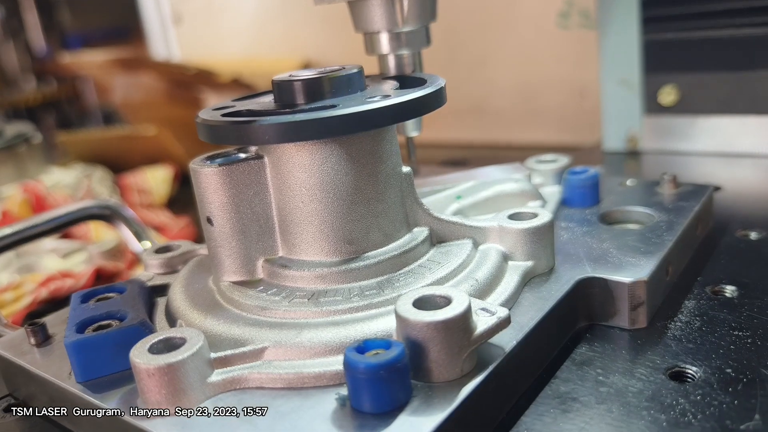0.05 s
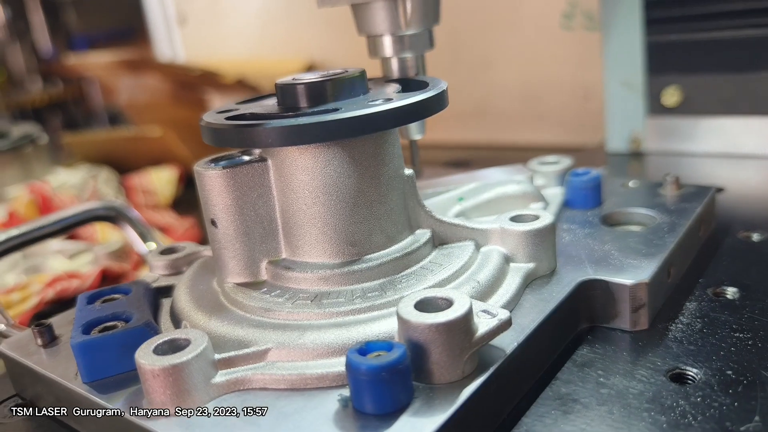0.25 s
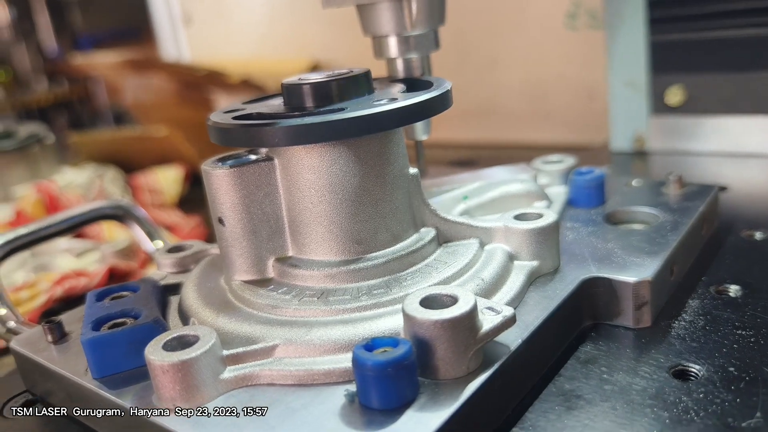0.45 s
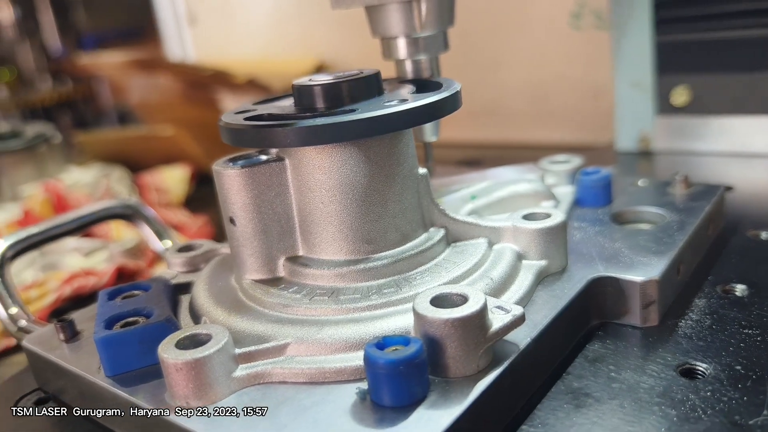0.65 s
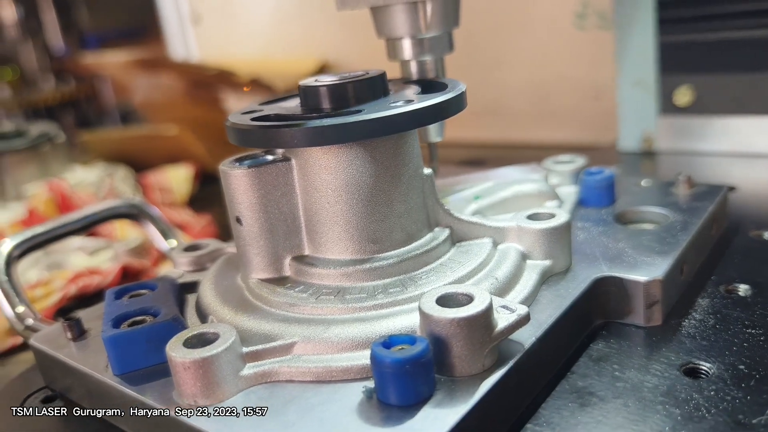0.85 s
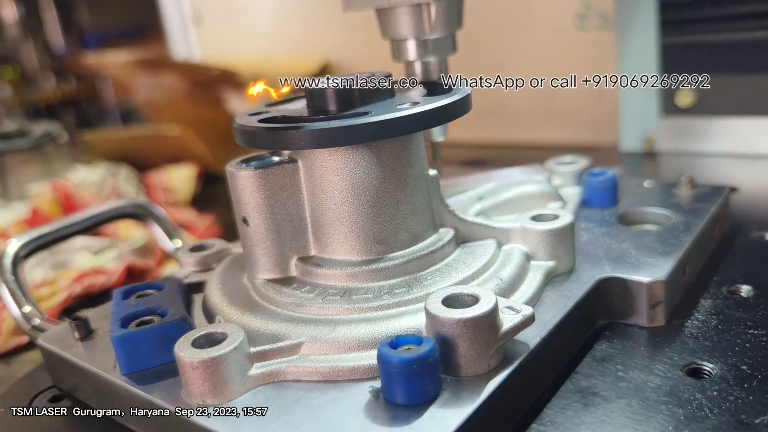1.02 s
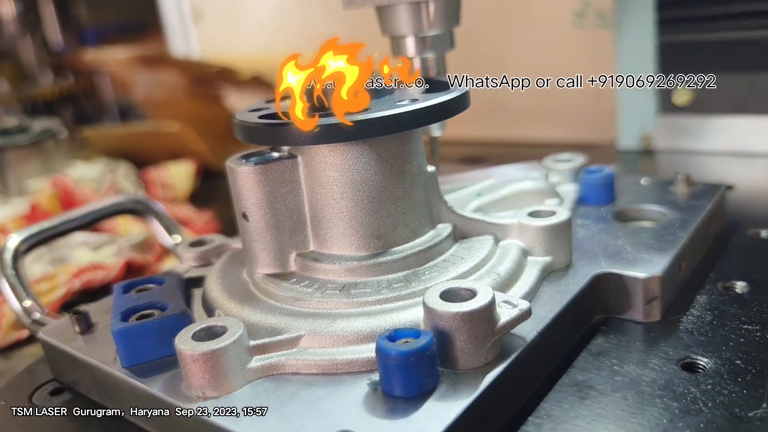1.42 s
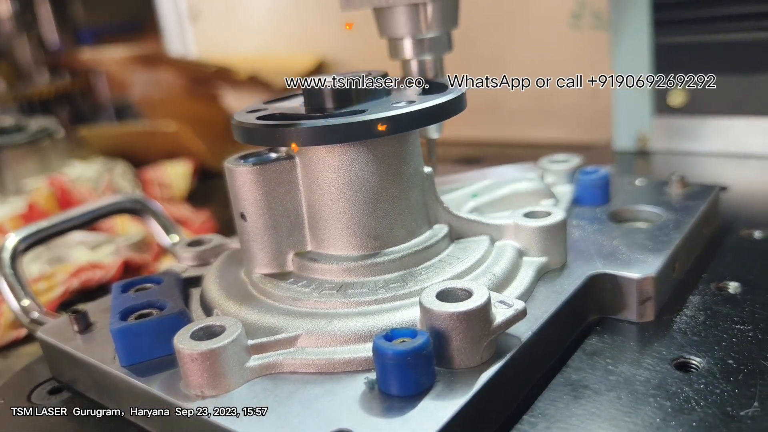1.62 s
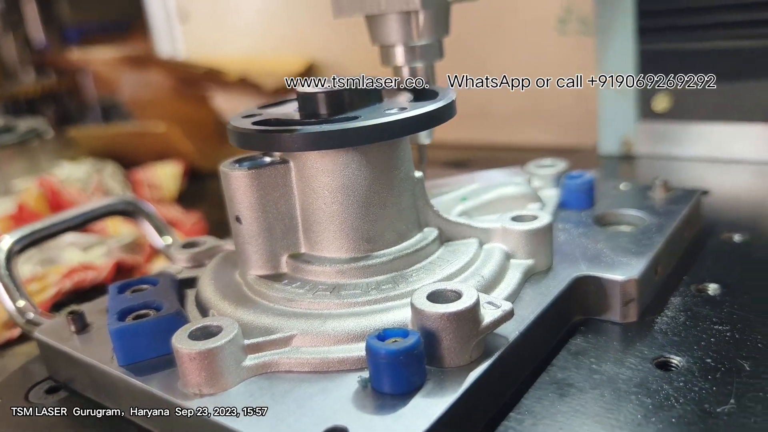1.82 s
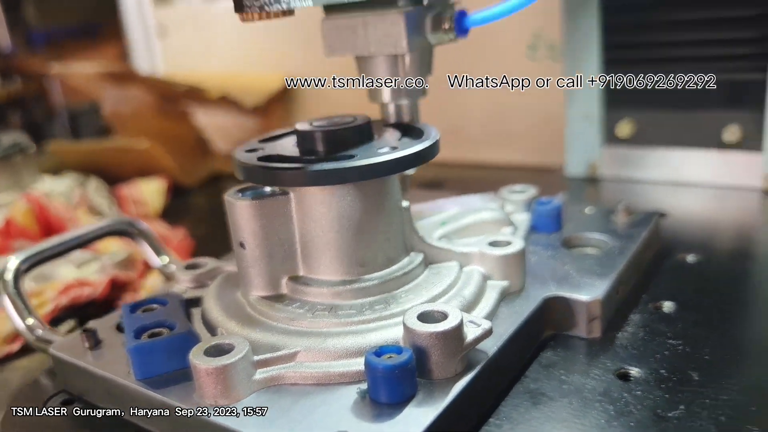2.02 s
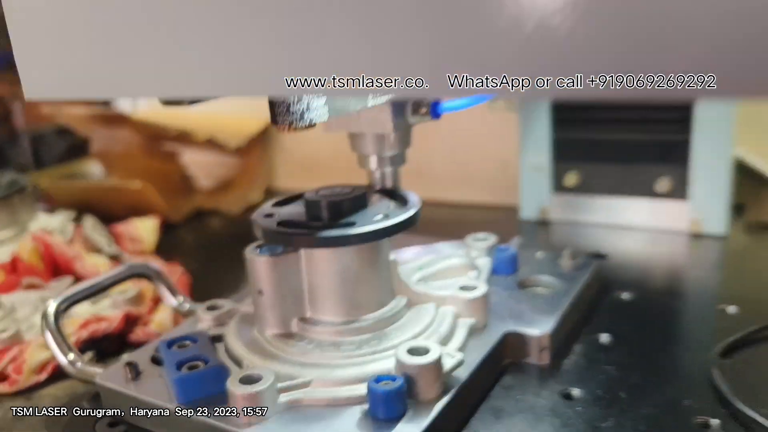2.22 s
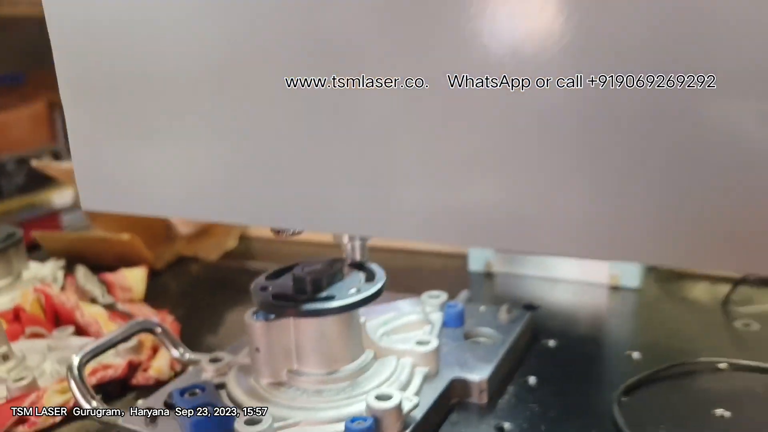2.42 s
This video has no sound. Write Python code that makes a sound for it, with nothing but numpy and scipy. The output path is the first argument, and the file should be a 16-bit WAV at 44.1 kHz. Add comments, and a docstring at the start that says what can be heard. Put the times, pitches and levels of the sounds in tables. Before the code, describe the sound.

A pneumatic dot marker punches a metal part close by, in two quick runs of sharp, ringing taps with a brief pause between. Low workshop hum and a faint hiss of leaking air lie behind.

```python
"""In a workshop, close up, a pneumatic dot-pin marker punches two lines of ten dots into a metal part.
Each stroke is one cycle: the valve ticks and squeaks, the pin is launched, strikes and chatters,
its recoil clanks the casing and thumps the head, and the carriage steps on. A few strokes bring a low pop.
Behind them are mains hum, workshop noise and a faint hiss of leaking air; a short echo adds width."""
import sys
import numpy as np
from scipy import signal
from scipy.fft import rfft, irfft, next_fast_len
from scipy.io import wavfile
from scipy.ndimage import map_coordinates

SR = 44100
rng = np.random.default_rng(int(sys.argv[2]) if len(sys.argv) > 2 else 0)


def store_pcm(level_fs):
    """Save levels as 16-bit WAV."""
    pcm = np.round(np.clip(level_fs, -1, 1) * 32767).astype(np.int16)
    wavfile.write(sys.argv[1], SR, np.atleast_2d(pcm).T)


N = 112454
TIME = np.arange(N) / SR


def amp(db):
    """Decibels to gain."""
    return 10 ** (np.asarray(db) / 20)


def curve(points, hz):
    """Read (Hz, value) points along a log frequency axis."""
    knots, values = np.transpose(points)
    return np.interp(np.log(hz + 1), np.log(knots + 1), values)


def filtered(x, gain):
    """Apply a gain that depends on frequency."""
    size = next_fast_len(len(x) + 4096)
    return irfft(rfft(x, size) * gain(np.fft.rfftfreq(size, 1 / SR)), size)[:len(x)]


def eq(x, tone):
    """Shape a sound with an EQ curve of (Hz, dB) points."""
    return filtered(x, lambda hz: amp(curve(tone, hz)))


def noise(tone, size):
    """Coloured noise of rms 1."""
    x = eq(rng.standard_normal(size), tone)
    return x / np.sqrt(np.mean(x ** 2) + 1e-20)


def wobble(rate):
    """A smooth random curve, rate knots a second."""
    return map_coordinates(rng.standard_normal(int(N * rate / SR) + 4), [TIME * rate])


def add(track, start, sound):
    """Mix a sound into the track, start seconds in."""
    part = track[max(round(start * SR), 0):][:len(sound)]
    part += sound[:len(part)]


def ring(modes, scatter_db, detune, hold_s=0):
    """Damped modes, a little different at each blow, sustained for hold_s before they die away."""
    hz, db, t60 = np.transpose(modes)[:, :, None]
    level, pitch = rng.standard_normal((2, len(hz), 1))
    t = TIME[:int((t60.max() + hold_s) * SR)]
    decay = amp(db + scatter_db * level - 60 * np.maximum(t - hold_s, 0) / t60)
    return np.sum(decay * np.sin(2 * np.pi * hz * (1 + detune * pitch) * t), axis=0)


# The colour of the room tone. Each row: frequency in Hz, relative level in dB.
SHOP_TONE = [(12, -41), (20, -59), (38, -17.5), (59, -4), (76, -11), (196, -9), (232, -15.5), (306, -5),
             (372, -18.5), (404, -16), (614, -14.5), (788, -17.5), (906, -14), (1450, -20), (1870, -17),
             (3260, -34), (4950, -29), (6910, -35.5), (15500, -37.5)]


def workshop_noise():
    """A low, steady bed of shop noise whose level drifts slightly."""
    return amp(-37.5 + 0.7 * wobble(8)) * noise(SHOP_TONE, N)


# The partials of the hum. Each row: frequency in Hz, rms level in dB.
HUM_PARTIALS = [(48.6, -43.5), (306, -55.5), (398, -55.5), (597, -51), (632, -50.5), (888, -52.5)]


def mains_hum():
    """Each partial of the hum wavers on its own in level and phase."""
    out = np.zeros(N)
    for hz, db in HUM_PARTIALS:
        peak = np.sqrt(2) * amp(db + 0.54 * wobble(8.2))
        out += peak * np.sin(2 * np.pi * hz * TIME + hz / 400 * wobble(14))
    return out


# The colours of the hiss and the whistle. Each row: frequency in Hz, relative level in dB.
HISS_TONE = [(1500, -11), (4000, 5.5), (6300, -36.5), (7400, 1.5), (8300, 0.5), (9800, -11.5), (13000, -47),
             (15300, -2.5)]
WHISTLE_TONE = [(5000, -54), (7400, -18), (8000, -7), (8350, 1.5), (8700, -6.5), (10000, -22), (15000, -32)]
# Their fader moves. Each row: time in seconds, level in dB.
HISS_FADER = [(0, -51), (.2, -56), (.5, -44.5), (.95, -50), (1.1, -46), (1.3, -45.5), (1.5, -48),
              (1.9, -45), (2.18, -48), (2.4, -42), (2.55, -49)]
WHISTLE_FADER = [(1.42, -80), (1.48, -42), (1.7, -42), (2.0, -46), (2.15, -53), (2.35, -70)]


def air_leak():
    """Leaking air hisses throughout and whistles during the second line of dots."""
    hiss_db = np.interp(TIME, *np.transpose(HISS_FADER)) + 0.27 * wobble(27.04)
    hiss = amp(hiss_db) * noise(HISS_TONE, N)
    whistle_db = np.interp(TIME, *np.transpose(WHISTLE_FADER)) + 1.9 * wobble(39.9)
    return hiss + amp(whistle_db) * noise(WHISTLE_TONE, N)


# How long the room rings. Each row: frequency in Hz, time to fall 60 dB in seconds.
ECHO_DECAY = [(100, 0.073), (500, 0.49), (2000, 0.083), (8000, 0.095), (15000, 0.099)]
# The EQ on the echo. Each row: frequency in Hz, gain in dB.
ECHO_TONE = [(60, -56), (150, 8.5), (350, -16), (520, -10), (900, -5.5), (2000, -18), (4000, -10),
             (8000, -53.5), (15000, -42)]


def room_echo(x):
    """The workshop's short echo, a noise tail that lingers longest in the low mids."""
    hz, t, spectrum = signal.stft(rng.standard_normal(SR // 2), SR, nperseg=256)
    decay = amp(-60 * t / curve(ECHO_DECAY, hz)[:, None])
    tail = signal.istft(spectrum * decay, SR, nperseg=256)[1]
    response = np.pad(tail, (400, 0)) / np.linalg.norm(tail)  # 9 ms of pre-delay
    return eq(signal.fftconvolve(x, response)[:N], ECHO_TONE)


# The pops. Each row: time in seconds, push level in dB, suction level in dB.
POP_CUES = [(.2233, -27, -20), (0.3113, -4, -7), (.3988, -24, -36), (.5417, -14, -19), (.9365, -19, -20),
            (1.618, -2, -17), (1.851, -8, -21)]


def low_pops():
    """An occasional low pop: a sharp push of pressure, a longer suction and a slow swing back."""
    def pulse(centre_s, width_s):
        return np.exp(-((TIME - centre_s) / width_s) ** 2)

    out = np.zeros(N)
    for start, push_db, suction_db in POP_CUES:
        out += amp(push_db) * pulse(start, width_s=0.00025)
        out -= amp(suction_db) * pulse(start + 0.002, width_s=0.0018)
        out += 0.14 * amp(suction_db) * pulse(start + 0.01, width_s=0.0034)
    return signal.sosfilt(signal.butter(2, 22, "highpass", fs=SR, output="sos"), out)


# The cue sheet for the whole machine, one stroke per dot. Each row: start in seconds,
# then trims in dB for launch, strike, rebound, head and carriage.
STROKE_CUES = [(0.2091, 1.5, 4, 3.5, 5.6, -4), (0.2961, -1, 0.3, 0.3, 2, -1.2),
               (0.3837, -2, 4, 4, 5.6, -1.7), (0.4713, -1.5, 0.5, 2.6, 6.5, -0.7),
               (0.5882, -2, 2, 2, 5.4, -1.2), (0.6472, -1.5, 1.5, 2, 4.5, 1),
               (0.7048, -2, -2.5, 2.2, 4, -2), (0.7919, -1.5, 0, 3.9, 4.5, -0.5),
               (0.8511, -2.5, 0, 3.5, 3.7, -0.6), (0.9094, -5.5, 0, 1.5, 3, 0),
               (1.4576, 0, 4.2, 3.1, 4, -0.9), (1.604, 0, 2.5, 1, -1, -3),
               (1.6913, -1.7, 0.3, 0.7, 6, -1.3), (1.779, -1.5, 2, 1.5, 4.2, -1),
               (1.837, -3, 4, -1.5, 4, 0.2), (1.8957, -2, 2.3, 0.5, 3.5, -1.3),
               (1.9541, -2.5, 2, -2.5, 1.7, -1.2), (2.0412, -3.5, 2, 0.5, 3, -1.5),
               (2.1002, -3, 0.9, 0, 0.5, -1.9), (2.2175, -0.5, 0, 0.7, 0, -2.5)]
# Extra steps on a longer move of the carriage. Each row: start in seconds, trim in dB.
EXTRA_STEPS = [(.517, -6.5), (.53, -10)]
# The frame's ring. Each row: frequency in Hz, relative level in dB, time to fall 60 dB in seconds.
FRAME_MODES = [(124, -29, .13), (172, -40, .08), (220, -37, .07), (507, -19, .06), (545, -33, .035),
               (795, -29, .055), (838, -33, .06), (915, -30, .045), (1080, -34, .045), (1155, -30, .06),
               (1394, -32, .06), (1660, -34, .055)]
# The colour of the rattle. Each row: frequency in Hz, relative level in dB.
RATTLE_TONE = [(100, -5), (400, -19), (650, -26), (900, 12), (1250, -24), (1700, 7), (2300, 2.5),
               (2900, -16), (6000, -26)]


def carriage():
    """After each dot the carriage steps on: its frame sings briefly over a soft rattle."""
    delay_s, attack_s, rattle_t60_s = 0.0245, 0.002, 0.04
    steps = [(start + delay_s, db) for start, *_, db in STROKE_CUES]
    out = np.zeros(N)
    for start, db in steps + EXTRA_STEPS:
        frame = amp(0.5) * ring(FRAME_MODES, scatter_db=1.5, detune=0.005, hold_s=0.011)
        t = TIME[:len(frame)]
        rattle = amp(-24.5 - 60 * t / rattle_t60_s) * noise(RATTLE_TONE, SR // 4)[:len(t)]
        add(out, start, amp(db) * (frame + rattle) * np.minimum(t / attack_s, 1))
    return out


# The casing's clank and the head's heavy thump.
# Each row: frequency in Hz, relative level in dB, time to fall 60 dB in seconds.
CASING_MODES = [(1150, -33, .06), (1400, -34, .06), (1565, -25, .065), (1820, -29, .045), (1950, -31, .035),
                (2170, -28, .06), (2298, -31, .05), (2470, -35, .035), (2645, -37, .08)]
HEAD_MODES = [(134, -29.5, 0.085), (194, -31.5, 0.093), (286, -24, 0.044), (376.3, -17, 0.045),
              (680, -37.5, 0.01)]
# The blows each takes in one stroke. Each row: delay in seconds, trim in dB.
CASING_BLOWS = [(0.0001, 2), (.0092, 2.5), (0.0155, -5)]
HEAD_BLOWS = [(.0002, -7.5), (.0082, -9), (0.0141, -2.5)]


def head_recoil():
    """The pin's recoil clanks the casing and thumps the whole head."""
    casing_db, casing_attack_s = -1.5, 0.001
    out = np.zeros(N)
    for start, *_, head_db, _ in STROKE_CUES:
        for delay, db in CASING_BLOWS:
            clank = ring(CASING_MODES, scatter_db=2.5, detune=0.004)
            attack = 1 - np.exp(-TIME[:len(clank)] / casing_attack_s)
            add(out, start + delay, amp(db + casing_db) * clank * attack)
        for delay, db in HEAD_BLOWS:
            thump = ring(HEAD_MODES, scatter_db=1.2, detune=0.004)
            add(out, start + delay, amp(db + head_db) * thump)
    return out


# The bright ring of pin and part. Each row: frequency in Hz, relative level in dB on the first line
# of dots, the same on the second line, time to fall 60 dB in seconds.
STEEL_MODES = [(4480, -16, -17, .03), (5320, -17, -18, .04), (7100, -16, -12, .04), (7595, -7, -8, .055),
               (7800, -12, -10, .05), (7990, -11, -12, .04), (8370, -10, -8, .05), (8640, -9, -14, .04),
               (9650, -14, -19, .06), (10350, -22, -15, .04), (11600, -11, -17, .05),
               (14380, -15, -20, .035), (15280, -13, -15, .03)]
SECOND_LINE_S = 1.2


def steel_ring(start):
    """A few clear steel modes, whose balance depends on the line being marked."""
    modes = [(hz, first_db if start < SECOND_LINE_S else second_db, t60)
             for hz, first_db, second_db, t60 in STEEL_MODES]
    return ring(modes, scatter_db=3, detune=0.003)


def contacts(pattern, tone, trims_db, steel_db):
    """Steel meets steel: a dense, short ring and clear modes, in the same pattern at each stroke."""
    attack_s, jitter_s = 0.00078, 0.00025
    repeat_share = 0.6  # of the dense ring's power, alike at every stroke
    out, t = np.zeros(N), TIME[:2048]
    for delay, db, t60 in pattern:
        repeated = noise(tone, len(t))
        variations = noise(tone, len(t) * len(STROKE_CUES)).reshape(-1, len(t))
        envelope = amp(-60 * t / t60) * (1 - np.exp(-t / attack_s))
        for (start, *_), trim_db, fresh in zip(STROKE_CUES, trims_db, variations):
            onset = start + delay + jitter_s * rng.normal()
            dense = np.sqrt(repeat_share) * repeated + np.sqrt(1 - repeat_share) * fresh
            add(out, onset, amp(db + trim_db) * envelope * dense)
            add(out, onset, amp(db + trim_db + steel_db) * steel_ring(onset))
    return out


# The tick ahead of each stroke. Its row: offset in seconds, level in dB, time to fall 60 dB in seconds.
VALVE_TICK = [(-0.018, -33, 0.054)]
# The colour of the tick. Each row: frequency in Hz, relative level in dB.
VALVE_TONE = [(2500, -11), (4400, -3.5), (6300, -6), (8200, 5), (9400, -14), (10500, -8), (11600, 0),
              (13000, -13), (15300, -11)]


def valve():
    """The valve opens with a tick, and the air squeaks upwards in pitch."""
    base_hz, sweep_hz_per_s, length_s = 3935, 140000, 0.011
    squeaks, t = np.zeros(N), TIME[:int(length_s * SR)]
    swell = np.sin(np.pi * t / length_s)
    for start, *_ in STROKE_CUES:
        level, pitch = rng.standard_normal(2)
        hz = (base_hz + sweep_hz_per_s * t) * (1 + 0.02 * pitch)
        squeak = swell * np.sin(2 * np.pi * np.cumsum(hz) / SR)
        add(squeaks, start + VALVE_TICK[0][0], amp(-44.5 + 2 * level) * squeak)
    return squeaks + contacts(VALVE_TICK, VALVE_TONE, np.zeros(len(STROKE_CUES)), steel_db=-17)


# The pin's hits within one stroke.
# Each row: delay in seconds, relative level in dB, time to fall 60 dB in seconds.
LAUNCH_HITS = [(.0002, -10, 0.022), (.0027, -26, 0.066)]
STRIKE_HITS = [(.0084, -13.5, 0.023), (.0109, -27.5, 0.06)]
REBOUND_HITS = [(.0141, -11, .022), (.0162, -16, .03), (.0188, -28, .035)]
# The dense ring of the pin and its guide. Each row: frequency in Hz, relative level in dB.
LAUNCH_TONE = [(500, -30), (1100, -4), (1600, 0), (2250, 0), (2750, -12), (3600, -8), (4600, -13),
               (5300, -9), (6200, -16), (7200, -3), (8400, -1), (10000, -8), (11000, -14), (11700, -8),
               (13000, -9), (14500, -6), (15300, -4)]
STRIKE_TONE = [(400, -20), (900, -1.5), (2100, -5.5), (2800, -19), (3600, -6.5), (4500, -9.5), (4900, -12),
               (6500, -15.5), (7100, -3), (7700, 0.5), (8600, -1.5), (9200, -4.5), (10000, -11.5),
               (11600, -10.5), (13000, -10.5), (14400, -10), (15300, -9.5)]


def pin():
    """The pin is launched, strikes the part and chatters as it rebounds."""
    _, launch_db, strike_db, rebound_db, _, _ = np.transpose(STROKE_CUES)
    launch = contacts(LAUNCH_HITS, LAUNCH_TONE, launch_db, steel_db=-6)
    strike = contacts(STRIKE_HITS, STRIKE_TONE, strike_db, steel_db=-2)
    rebound = contacts(REBOUND_HITS, STRIKE_TONE, rebound_db, steel_db=-13)
    return launch + strike + rebound


# Sends to the side channel: the mix itself, which pulls it left, and an echo, which widens it.
# Each row: frequency in Hz, gain in dB.
LEFT_LEAN = [(130, -35), (240, -37), (350, -15.5), (520, -19.5), (800, -21), (2000, -62)]
ECHO_WIDTH = [(50, -35), (130, -53.5), (330, -37), (550, -13), (1000, -62), (2000, -32.5), (4000, -42),
              (15000, -27)]


def scene():
    """Nearly mono; the low mids lean to the left, and the machine's echo adds a little width."""
    machine = valve() + pin() + head_recoil() + carriage()
    mid = machine + amp(-3) * room_echo(machine) + low_pops()
    mid += mains_hum() + air_leak() + workshop_noise()
    side = eq(mid, LEFT_LEAN) + eq(room_echo(machine), ECHO_WIDTH)
    return np.array([mid + side, mid - side])


def record(dry):
    """The recorder blocks steady pressure and keeps nothing above its band limit."""
    low_cut_hz, top_hz = 10, 15600

    def gain(hz):
        return hz / np.hypot(hz, low_cut_hz) / np.sqrt(1 + (hz / top_hz) ** 240)

    return np.array([filtered(channel, gain) for channel in dry])


dry = scene()
out = record(dry)
store_pcm(out)
```